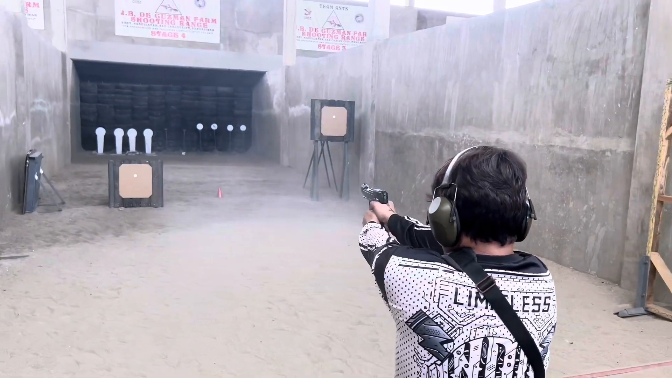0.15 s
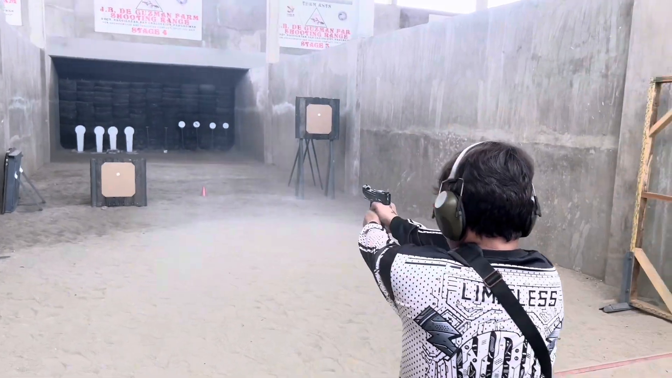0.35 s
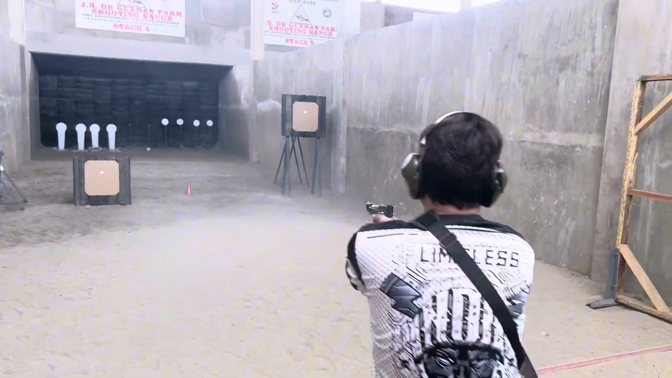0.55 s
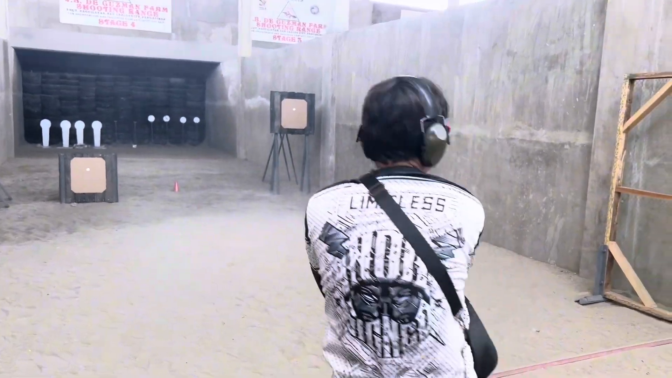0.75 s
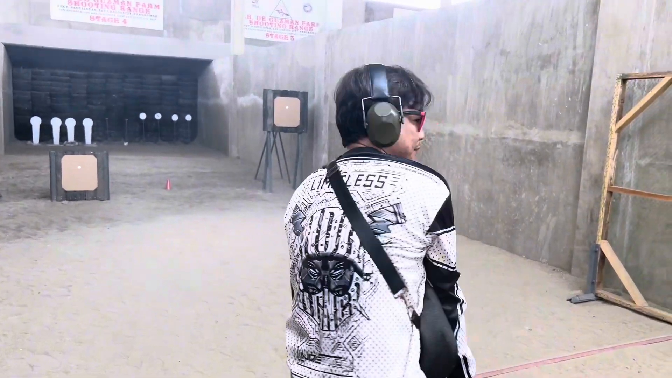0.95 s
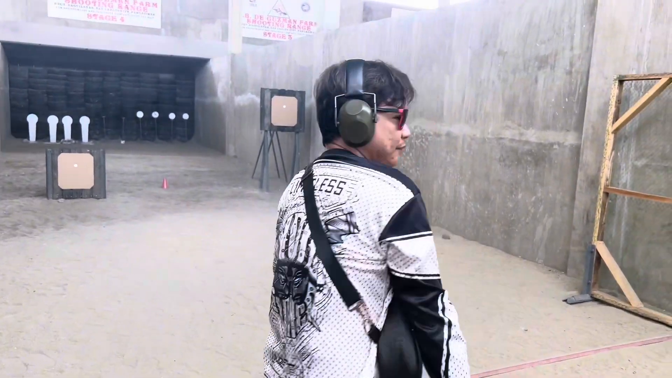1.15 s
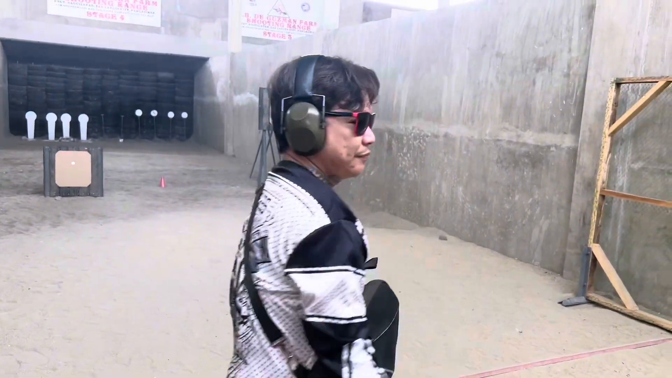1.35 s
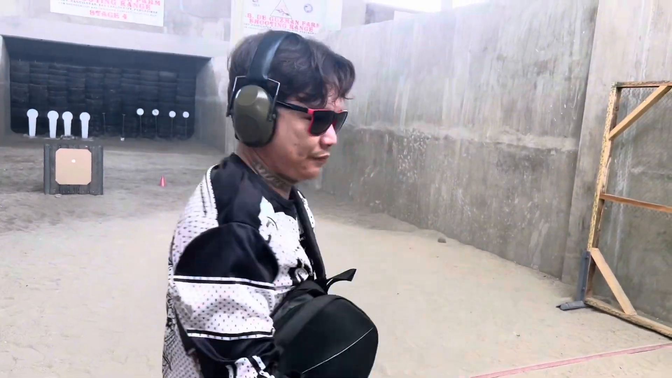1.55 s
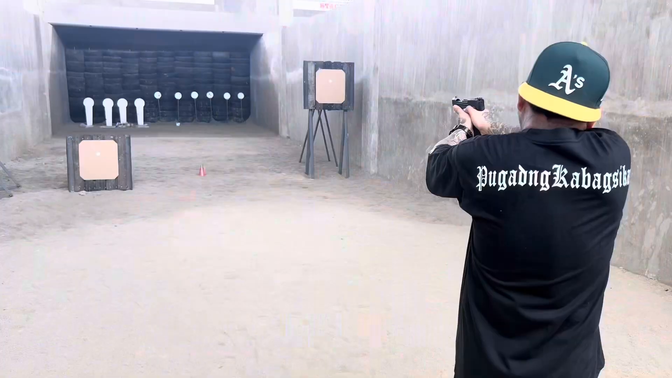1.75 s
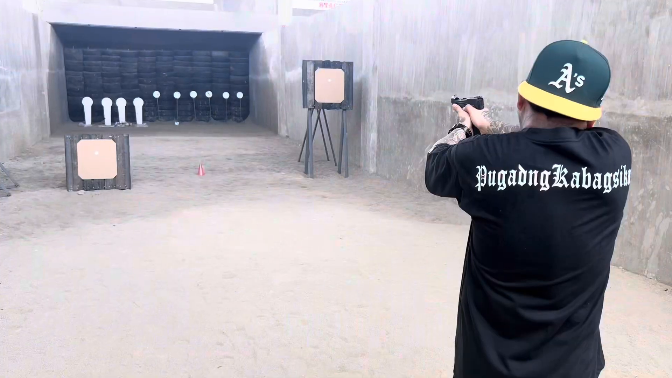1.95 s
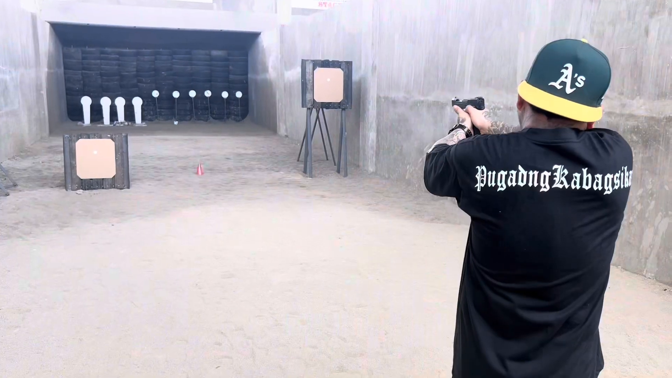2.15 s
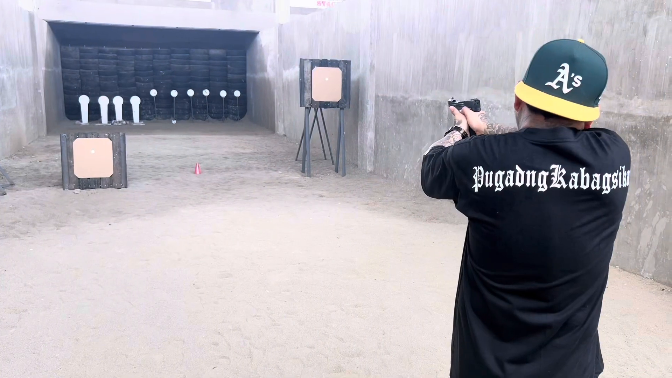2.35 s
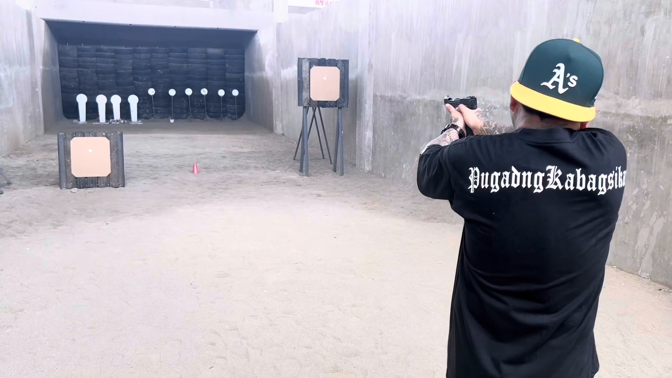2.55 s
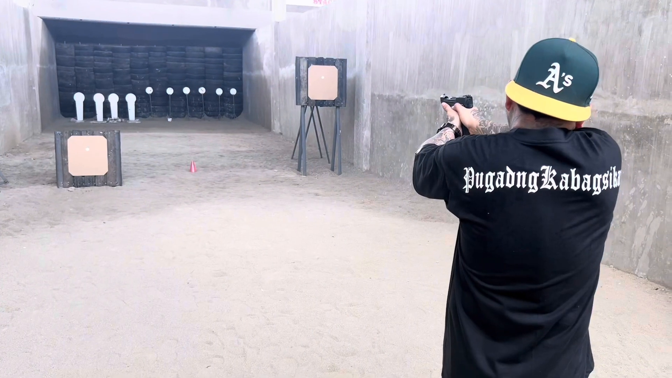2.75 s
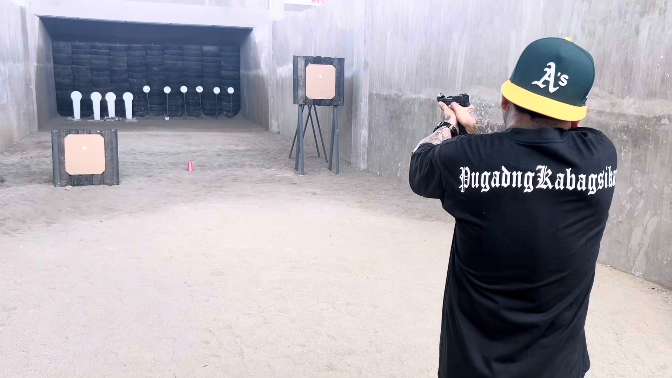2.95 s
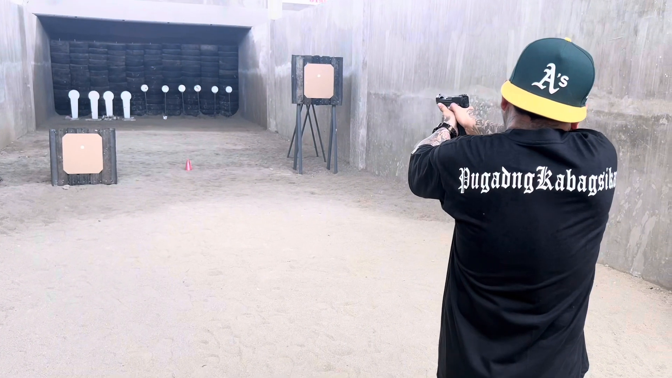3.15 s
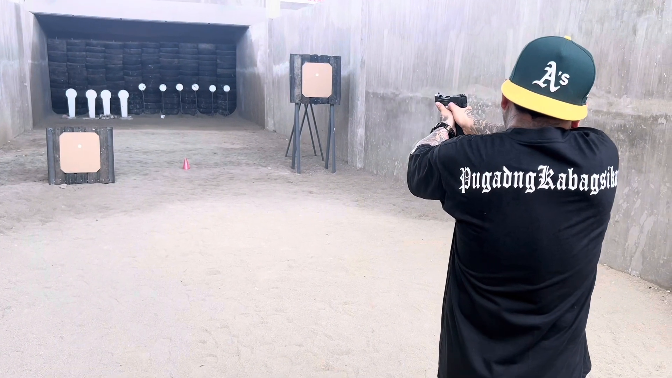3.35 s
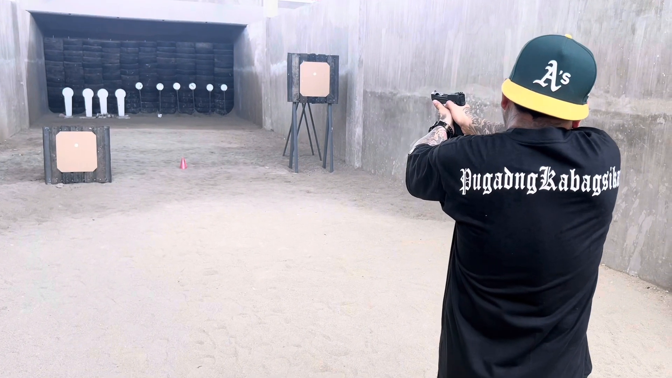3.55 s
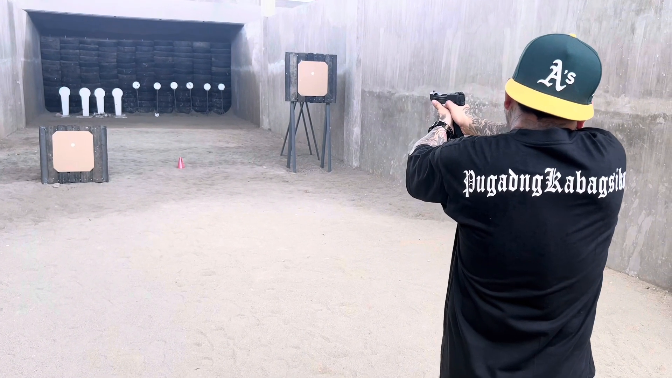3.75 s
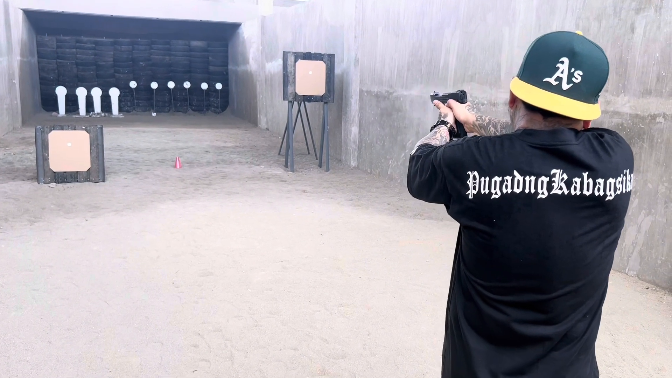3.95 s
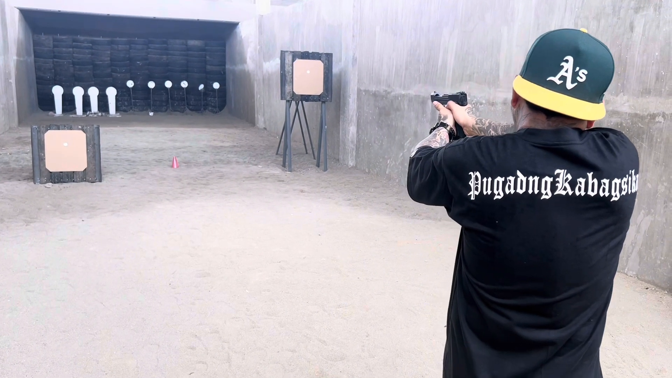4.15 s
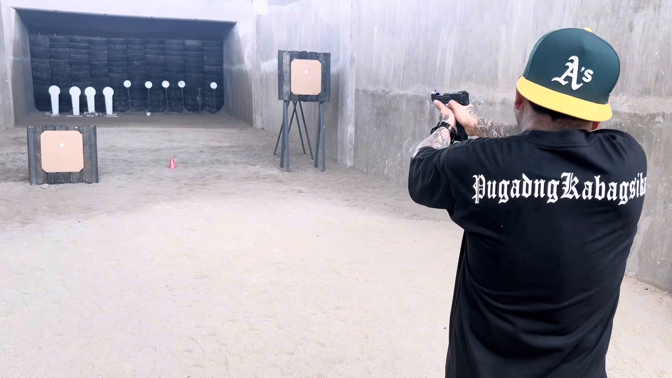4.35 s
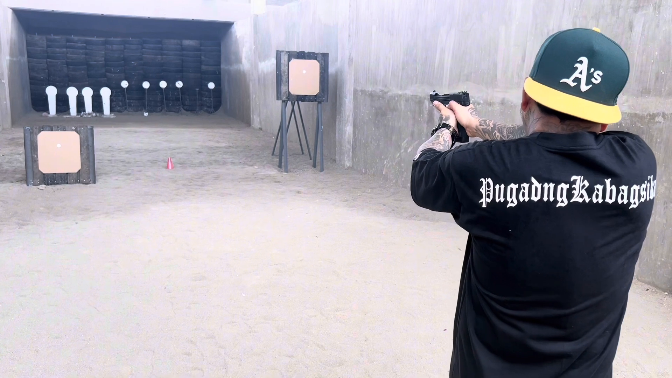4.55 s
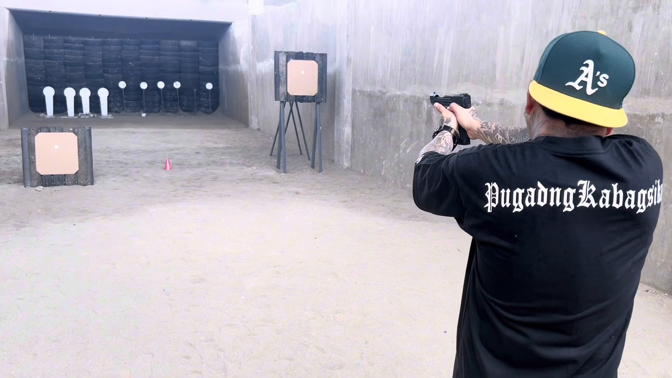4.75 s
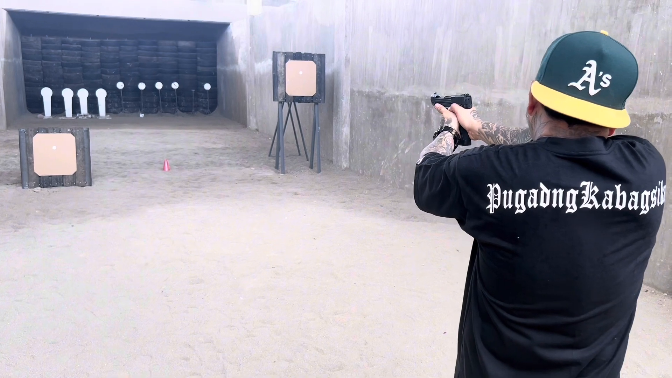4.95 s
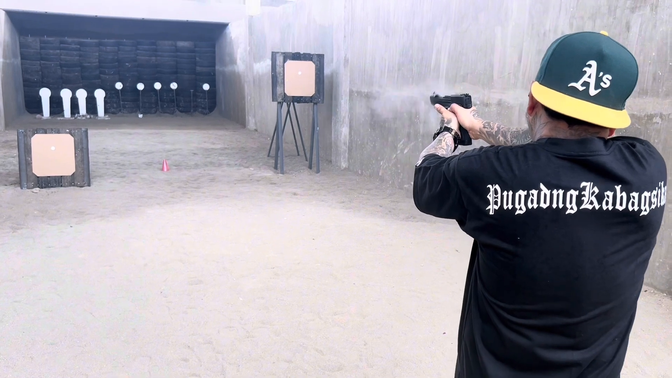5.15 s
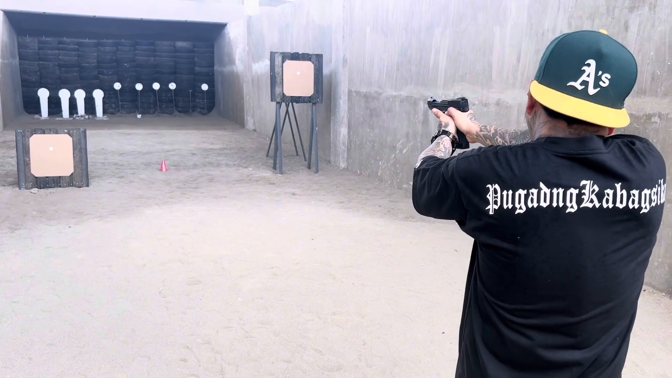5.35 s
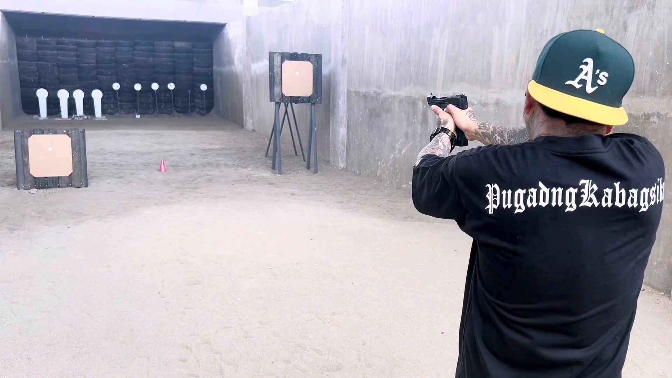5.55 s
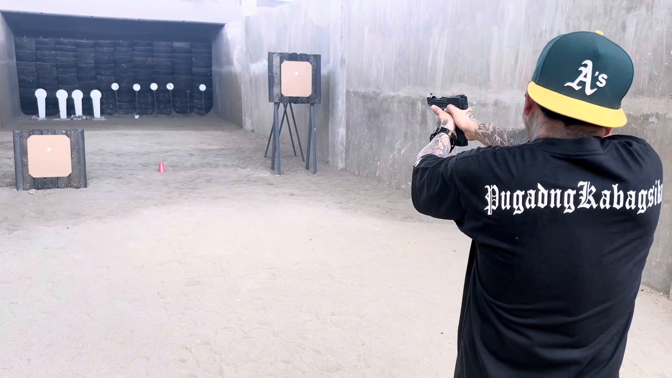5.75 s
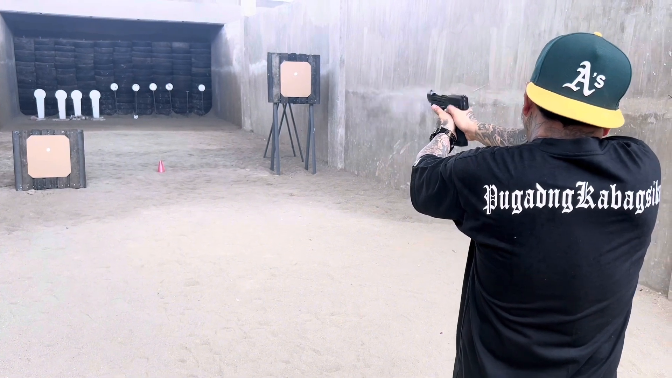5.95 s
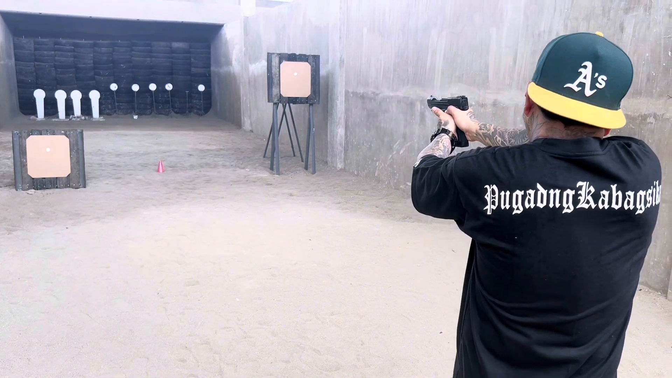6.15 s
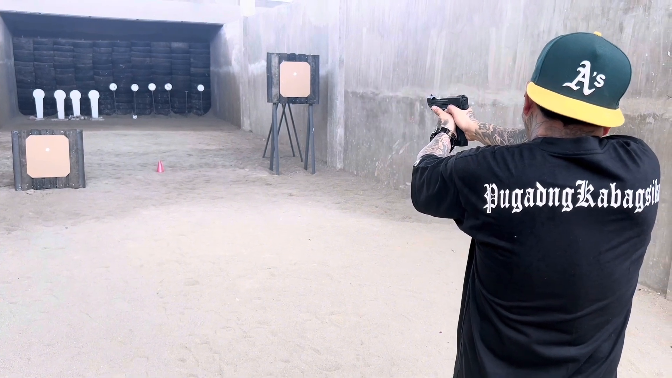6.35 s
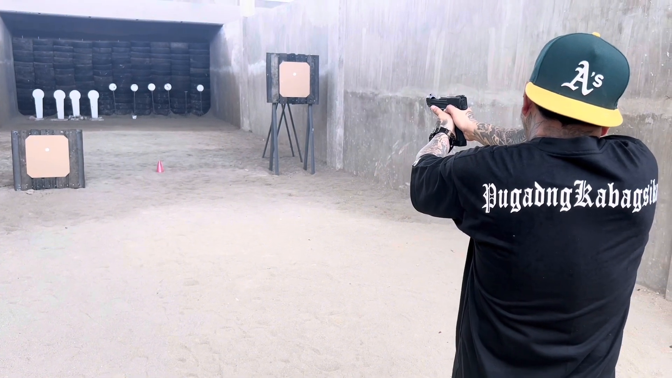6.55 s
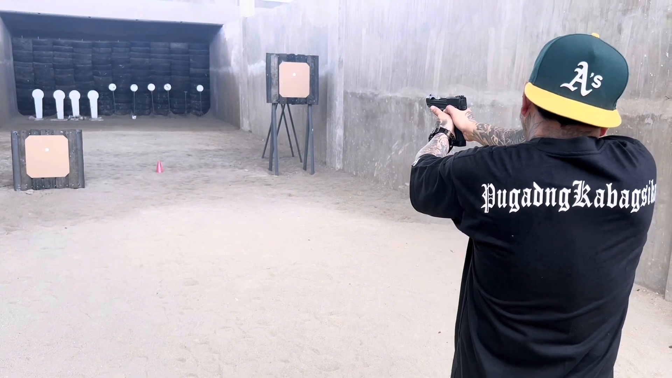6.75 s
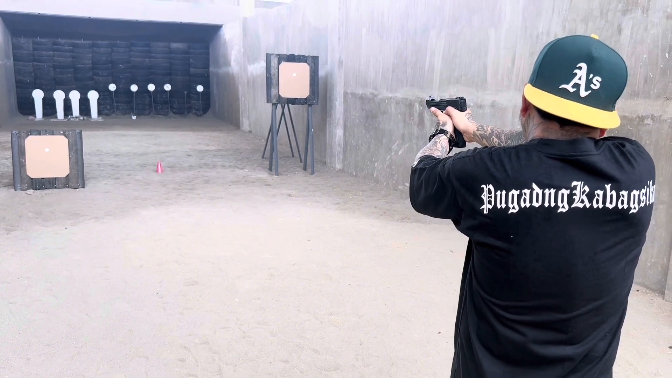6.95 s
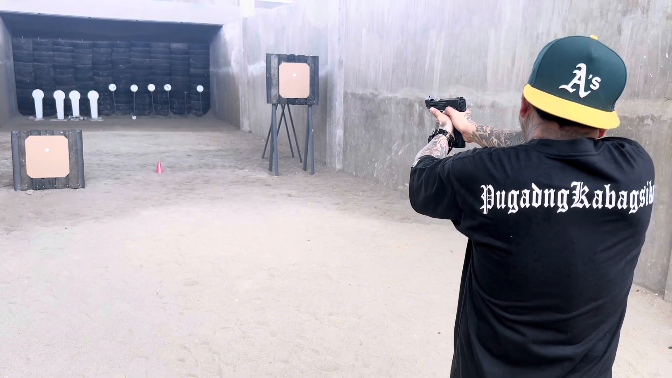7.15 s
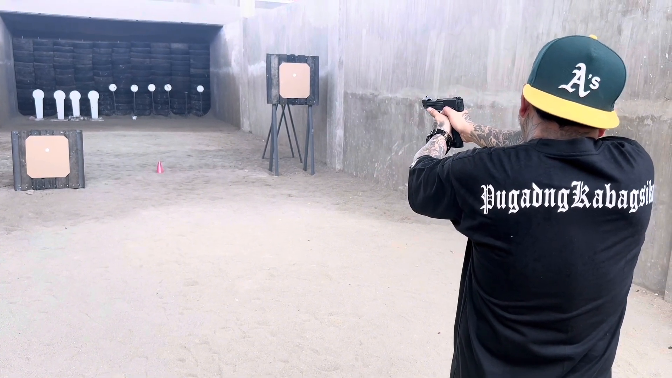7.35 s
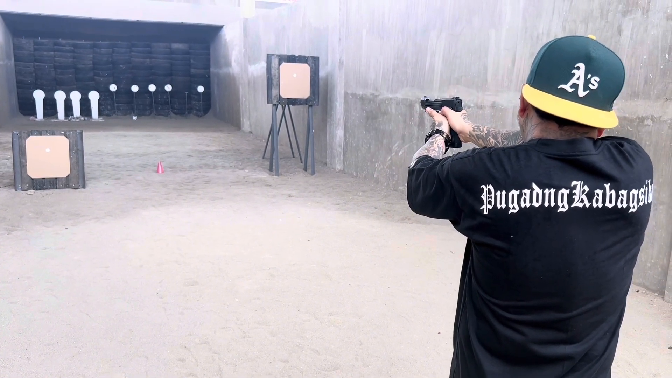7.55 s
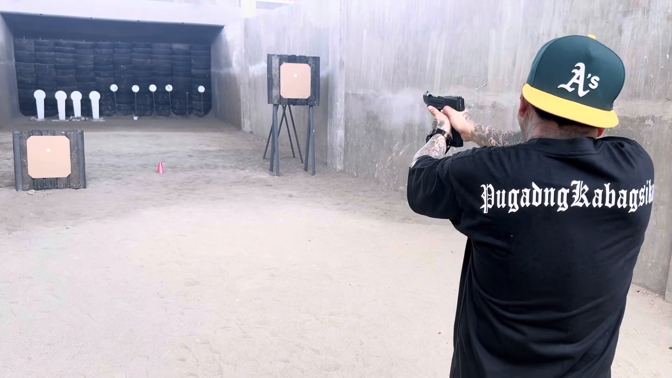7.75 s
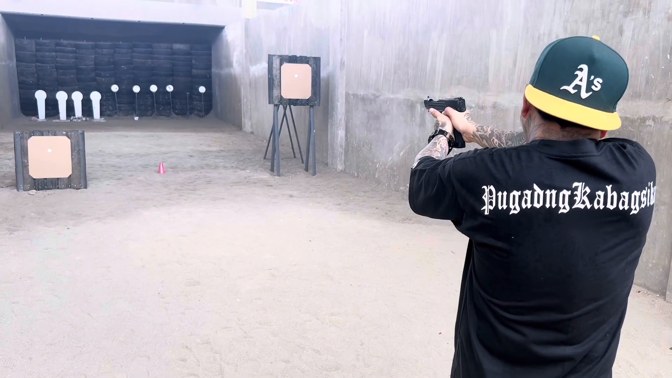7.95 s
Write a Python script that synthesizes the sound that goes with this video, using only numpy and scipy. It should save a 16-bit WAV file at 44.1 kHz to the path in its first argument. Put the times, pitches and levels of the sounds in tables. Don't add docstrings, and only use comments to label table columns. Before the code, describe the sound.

Close behind a shooter, a phone catches a fading gunshot echo, an abrupt cut to humming air, then six single handgun blasts about one second apart, with a longer wait before the last. Each cracks, bounces off ground and concrete walls in quick slaps, and decays dully for about a second. Small details: cases clicking down, a brief cloth rustle, one distant bright metallic ring. The loud blasts slightly overload the microphone and push the background down.

```python
import sys
import numpy as np
from scipy import signal
from scipy.fft import rfft, irfft, next_fast_len
from scipy.io import wavfile
from scipy.ndimage import uniform_filter1d

SR = 44100
rng = np.random.default_rng(int(sys.argv[2]) if len(sys.argv) > 2 else 0)


def output_pcm(signal):
    pcm = np.clip(np.atleast_2d(signal).T, -1, 1) * 32767
    wavfile.write(sys.argv[1], SR, np.round(pcm).astype(np.int16))


def to_linear_factor(level_db):
    exponent = np.asarray(level_db, float) / 20
    return 10 ** exponent


N = 356769
LONG = 2 ** 16


def evened(x):
    return x / np.sqrt(np.mean(x ** 2) + 1e-20)


def read(points, hz):
    f, value = np.transpose(points)
    return np.interp(np.log(hz + 1), np.log(f + 1), value)


def add(mix, start_s, sound):
    at = round(start_s * SR)
    part = mix[:, max(at, 0):][:, :sound.shape[1] + min(at, 0)]
    part += sound[:, max(-at, 0):][:, :part.shape[1]]


def sides(pan_db):
    return to_linear_factor(np.array([[pan_db / 2], [-pan_db / 2]]))


# frequency in Hz, likeness 0-1.
PORT_LIKENESS = [(60, 1), (400, 0.99), (900, 0.24), (1500, 0.23), (3000, 0.46), (5000, 0.18), (7000, 0.21),
                 (8400, .85), (10000, 0.78), (13000, 1), (13800, .6), (14800, 0.93)]


def ports(a, b):
    hz = np.fft.rfftfreq(len(a), 1 / SR)
    same = np.clip(read(PORT_LIKENESS, hz), 0, 1)
    left, other = rfft(a), rfft(b)
    right = same * left + np.sqrt(1 - same ** 2) * other
    return hz, np.array([left, right])


# frequency in Hz, width in Hz.
HUM = [
    (119, 19),
    (360, 16),
    (320, 50),
    (1163, 40),
]
HUM_DB = [-3, -12.5, -21, -23]


def air(colour, patchy_db=1.2):
    hz, z = ports(*rng.standard_normal((2, 2 * next_fast_len(N // 2 + 1))))
    cells = signal.stft(irfft(z * to_linear_factor(read(colour, hz))), nperseg=512)[2]
    patches = rng.standard_normal(cells.shape[1:])
    patches = uniform_filter1d(patches, size=6, axis=0)
    patches = evened(uniform_filter1d(patches, size=14, axis=1))
    wash = evened(signal.istft(cells * to_linear_factor(patchy_db * patches), nperseg=512)[1][:, :N])
    t, hum = np.arange(N) / SR, 0
    for (tone_hz, width_hz), db in zip(HUM, HUM_DB):
        resonance = 1 / (1 + (2 * (hz - tone_hz) / width_hz) ** 2)
        fuzz = evened(irfft(z * resonance))[:, :N]
        core = 0.77 * np.sin(2 * np.pi * tone_hz * t) * (width_hz < 20)
        hum = hum + to_linear_factor(db) * (fuzz + core)
    return evened(wash + hum)


# start in seconds, peak in dB, centre in Hz, t60 in seconds, left-right in dB.
TICKS = [
    (1.18, -74, 6500, .15, 1),
    (3.6546, -45, 7000, 0.005, 4.5),
    (3.6564, -42, 7000, 0.008, 4),
    (3.6677, -51, 8000, .004, 5),
    (4.56, -55, 4600, 0.22, 6.5),
    (4.778, -51, 10700, 0.0068, 2.5),
    (6.771, -48, 11000, 0.0045, 2.5),
    (7.28, -75, 6500, 0.12, 11.5),
]


def ticks():
    t, out = np.arange(12000) / SR, np.zeros((2, N))
    for start_s, db, hz, t60_s, pan_db in TICKS:
        band = signal.butter(1, [.6 * hz, 1.45 * hz], "band", fs=SR, output="sos")
        burst = evened(signal.sosfilt(band, rng.standard_normal(len(t))))
        rise = np.minimum(t / max(.13 * t60_s, .0002), 1)
        fall = to_linear_factor(db - 60 * t / max(t60_s, .003))
        add(out, start_s, fall * rise * sides(pan_db) * burst)
    return out


# frequency in Hz, level in dB, t60 in seconds.
PLATE_MODES = [(6008, -5.5, 0.56), (7600, -8.5, 0.37), (8403, 2, 0.31), (9390, -9.5, 0.75),
               (11600, -0.5, 0.27), (12400, 1, 0.27), (12930, -17, 0.33), (13230, -7.5, 0.049),
               (14760, -26.5, 0.3), (15580, -13.5, 0.25)]


def plate(level_db=-37):
    t, ring = np.arange(30000) / SR, np.zeros((2, 30000))
    for hz, db, t60_s in PLATE_MODES:
        waver = evened(uniform_filter1d(rng.standard_normal((2, len(t))), 600))
        ring += to_linear_factor(db - 60 * t / t60_s) * (1 + .5 * waver) * np.sin(2 * np.pi * hz * t)
    splash = evened(np.diff(rng.standard_normal(len(t) + 1))) * to_linear_factor(4.5 - 60 * t / .12)
    return to_linear_factor(level_db) * (ring + splash) * np.minimum(t / .002, 1)


# frequency in Hz, level in dB per Hz.
SMEAR_COLOUR = [(100, -5), (500, 4.5), (1100, -16), (1500, -32.5), (2100, -14), (3500, -29), (6000, -12.5),
                (8000, -32), (9000, -69)]


def smear(db, rise_s=.004, faint_db=-14, faint_rise_s=0.0059, pan_db=-8, patchy_db=5):
    t = (np.arange(1024) - 1024) / SR
    hz, z = ports(*rng.standard_normal((2, len(t))))
    patches = np.repeat(rng.standard_normal(65), 8)[:len(hz)]
    noise = evened(irfft(z * to_linear_factor(read(SMEAR_COLOUR, hz) + patchy_db * patches)))
    swell = np.exp(t / rise_s) + to_linear_factor(faint_db) * np.exp(t / faint_rise_s)
    fade_in = np.minimum((t - t[0]) / .003, 1)
    return t[0], to_linear_factor(db) * sides(pan_db) * noise * swell * fade_in


def scatter(spread_db=1.5, clump_db=2.5, clump_s=.003, blend_s=.25):
    size_db = spread_db * np.minimum(rng.exponential(1, (2, LONG)), 5)
    z = rng.standard_normal((2, LONG)) * to_linear_factor(size_db)
    clumps = evened(uniform_filter1d(rng.standard_normal(LONG), max(round(clump_s * SR), 1)))
    depth_db = clump_db * np.exp(-np.arange(LONG) / SR / blend_s)
    return evened(z) * to_linear_factor(depth_db * clumps - depth_db ** 2 * np.log(10) / 20)


# arrival in seconds, length in seconds, level in dB, centre in Hz, width in octaves.
RETURNS = [
    (0.009, .025, 6, 179.3, 1.1),
    (0.029, .05, 9.5, 55, 0.69),
    (0.035, 0.018, 3, 902, 2.3),
    (.034, .108, 2.5, 6000, 2.2),
    (0.094, 0.064, 2.5, 696, 1.7),
]


def build(t, hz, gap_s=.0112, gap_db=-6, gap_from_hz=670, linger_db_per_s=2):
    in_gap = np.clip((gap_s - t) * 500 + .5, 0, 1)
    db = gap_db / (1 + (gap_from_hz / hz) ** 2) * in_gap + linger_db_per_s * t
    for start_s, lasts_s, top_db, centre_hz, octaves in RETURNS:
        inside_s = np.minimum(t - start_s, (start_s + lasts_s - t) / 2)
        present = np.clip(inside_s / .004 + .5, 0, 1)
        db = db + top_db * present * np.exp(-(np.log2(hz / centre_hz) / octaves) ** 2)
    return db


# frequency in Hz, level in dB per Hz.
TAIL_COLOUR = [(25, -21.5), (54, -9.5), (118, -8), (250, -5.5), (900, -4.5), (1550, -7), (1850, -11),
               (2700, -13.5), (3500, -17.5), (6000, -21.5), (12000, -24.5), (13700, -29), (14700, -22.5),
               (15800, -25.5)]
# frequency in Hz, t60 in seconds.
BAY_T60 = [(40, 1), (100, 0.75), (250, 1.263), (700, 1.434), (1200, 1.23), (1700, 1.63), (2200, 1.104),
           (3500, 1.15), (6000, 0.89), (12000, 0.56), (15000, 0.38)]


def tail(reflections, tilt_db, level_db=-17):
    hz, z = ports(*reflections)
    treble = np.clip(np.log2((hz + 1) / 2000), 0, 2) / 2
    z = z * to_linear_factor(read(TAIL_COLOUR, hz) + tilt_db * treble)
    z = z * (hz < 15900)
    z = z / np.sqrt(np.mean(irfft(z) ** 2))
    t, out = np.arange(LONG) / SR, np.zeros((2, LONG))
    centres_hz = np.append(np.geomspace(50, 12000, num=11), 15000)
    place = np.arange(len(centres_hz))
    for k, centre_hz in enumerate(centres_hz):
        share = np.interp(np.log(hz + 1), np.log(centres_hz), place == k)
        decay_db = 60 * t / read(BAY_T60, centre_hz)
        out += irfft(z * share) * to_linear_factor(build(t, centre_hz) - decay_db)
    return to_linear_factor(level_db) * out * np.minimum((LONG / SR - t) * 10, 1)


# delay in seconds, peak in dB, left-right in dB, pulse in Hz.
FRONT = [
    (.0007, -9, 13, 1500),
    (.0006, -6, 6, 6060),
    (.0003, -12, -6.5, 11500),
    (.005, -2.5, 3.5, 2285),
    (.0049, -8.5, 3, 5790),
    (.019, -16, 0, 230),
]
# delay in seconds, peak in dB, left-right in dB.
WALLS = [(0.0104, -21.5, 1), (0.031, -16.5, 2.5), (.041, -11, 4.5), (.043, -9, -3.5), (.046, -11.5, 7),
         (.051, -19, 5.5), (.065, -17, 7), (.076, -13, 0.5), (0.0918, -14.5, 2.5), (.0955, -8, 0),
         (.113, -11, 9.5), (.117, -21, 1), (.1295, -11, 3.5), (.133, -16, 2)]
# delay in seconds, peak in dB, left-right in dB, pulse in Hz.
SIDE_WALL = [
    (.037, -4, 2, 2360),
    (0.0457, 5, 2, 2620),
]


def slaps(likeness, sway_db=2.5, wall_hz=1060, dulls_hz_per_s=1700):
    t, out = np.arange(-300, 300) / SR, np.zeros((2, LONG))
    usual = FRONT + [(s, db, pan_db, wall_hz - dulls_hz_per_s * s) for s, db, pan_db in WALLS]
    surfaces = usual + SIDE_WALL
    sway = rng.standard_normal((len(surfaces), 2))
    share = [1] * len(usual) + [1 - likeness] * len(SIDE_WALL)
    for (delay_s, db, pan_db, hz), (size, late), part in zip(surfaces, sway, share):
        u = t * hz
        pulse = -np.cos(2 * np.pi * u + 0.39) * np.exp(-(u / 0.5) ** 2)
        shift_s = (1 - likeness) * .0004 * late * (delay_s > .01)
        peak_db = db + (2.0 - likeness) * sway_db * np.tanh(size)
        add(out, delay_s + t[0] + shift_s, part * to_linear_factor(peak_db) * sides(pan_db) * pulse)
    return out


def crack(db=-14, low_hz=4500, top_hz=13500, pan_db=3, t60_s=.009):
    t = np.arange(1500) / SR
    band = signal.butter(2, [low_hz, top_hz], "band", fs=SR, output="sos")
    noise = signal.sosfilt(band, rng.standard_normal(len(t)))
    return to_linear_factor(db - 60 * t / t60_s) * sides(pan_db) * noise


def thump(db, base_db=-12, hz=100, at_s=0.021, rise_s=0.0039, fall_s=0.004, pan_db=4, right_leads_s=0.002):
    t = np.arange(4000) / SR - at_s + np.array([[0], [right_leads_s]])
    shape = np.where(t < 0, np.exp(-(t / rise_s) ** 2), np.exp(-abs(t) / fall_s))
    return to_linear_factor(base_db + db) * sides(pan_db) * np.cos(2 * np.pi * hz * t) * shape


def shot(usual, db, thump_db, likeness, tilt_db=3):
    likeness = np.clip(likeness, 0, 1)
    reflections = likeness * usual + np.sqrt(1 - likeness ** 2) * scatter()
    out = tail(reflections, tilt_db) + slaps(likeness)
    add(out, 0, crack())
    add(out, 0, thump(thump_db))
    return to_linear_factor(db) * out


# frequency in Hz, level in dB per Hz.
AIR_BEFORE = [(15, -48), (30, -20), (45, -4.5), (123, -14), (250, -16.5), (330, -12), (575, -18),
              (800, -23.5), (1200, -21.5), (1650, -23), (1900, -27.5), (5280, -41), (12500, -52),
              (16000, -61.5)]
AIR_AFTER = [(15, -44.5), (30, 2.5), (80, -18), (114, -9.5), (195, -18), (326, -14.5), (600, -17.5),
             (750, -26), (1160, -22), (1940, -29), (4600, -36), (6400, -38), (7200, -43.5), (16000, -66)]
# start in seconds, level in dB, thump in dB,
# likeness to the usual stance, treble tilt in dB.
EARLIER = (-0.1683, -12, 0, -1, -3.5)
# start in seconds, level in dB, thump in dB, likeness 0-1 to the usual stance,
# smear ahead of the blast in dB.
SHOTS = [
    (2.0144, 1, -11, .4, -17.5),
    (3.026, 0, 7, 0.5, -14.5),
    (3.9002, 0, -1.5, .7, -20.5),
    (5.1135, 0, -6, 0.8, -24.5),
    (5.9632, 0, -6, 0.91, -26),
    (7.7452, 0, -2.5, 0.9, -23.5),
]


def scene(change_s=1.672, plate_s=4.008, duck_db=-8.5, duck_s=.15):
    t, usual = np.arange(N) / SR, scatter()
    ducked_db = duck_db * np.clip((t - SHOTS[0][0]) / duck_s, 0, 1)
    before = to_linear_factor(-64.5) * air(AIR_BEFORE)
    after = to_linear_factor(-49.5 + ducked_db) * air(AIR_AFTER)
    add(before, EARLIER[0], shot(usual, *EARLIER[1:]))
    for start_s, db, thump_db, likeness, smear_db in SHOTS:
        add(after, start_s, shot(usual, db, thump_db, likeness))
        ahead_s, noise = smear(smear_db)
        add(after, start_s + ahead_s, noise)
    add(after, plate_s, plate())
    return np.where(t < change_s, before, after) + ticks()


# frequency in Hz, left-right in dB.
LEAN = [(60, 0.5), (300, 0.5), (550, -1), (1200, 2), (2100, -1), (3000, 3), (4400, 2.5), (5900, 11),
        (7200, 2), (8000, 0)]
# frequency in Hz, right lead in radians.
TURN = [(50, 0), (200, -1.2), (500, -0.5), (900, -0.4), (1700, 2.5), (2200, 0), (3100, -1.5), (4800, 0),
        (6000, -1), (7200, -2), (8500, 0.5)]
# from Hz, width in Hz.
PORT_SLIPS = [(8500, 3450), (12800, 1900)]


def microphone(dry):
    size = next_fast_len(N + 4096)
    hz = np.fft.rfftfreq(size, 1 / SR)
    slip = 2 * np.pi * sum(np.clip((hz - low_hz) / wide_hz, 0, 1) for low_hz, wide_hz in PORT_SLIPS)
    turn = read(TURN, hz) + slip - np.sin(2 * slip) / 2
    gain = to_linear_factor(read(LEAN, hz) / 2) ** np.array([[1], [-1]])
    colour = gain * np.exp(1j * turn * np.array([[0], [1]]))
    return irfft(rfft(dry, size) * colour, size)[:, :N]


def top_cut(x):
    return signal.sosfilt(signal.butter(12, 16990, fs=SR, output="sos"), x)


def record(dry, ceiling=1.15):
    bass_cut = signal.butter(3, 42, "high", fs=SR, output="sos")
    heard = signal.sosfilt(bass_cut, microphone(dry))
    mix = np.tanh(heard / ceiling) * ceiling
    return top_cut(mix)


dry = scene()
out = record(dry)
output_pcm(out)
```